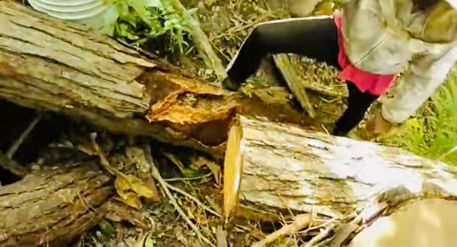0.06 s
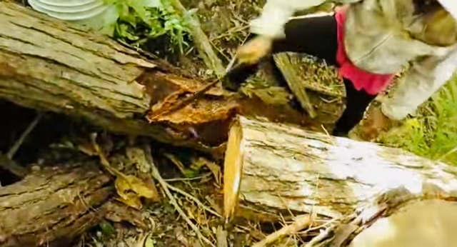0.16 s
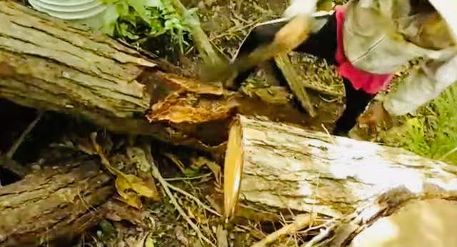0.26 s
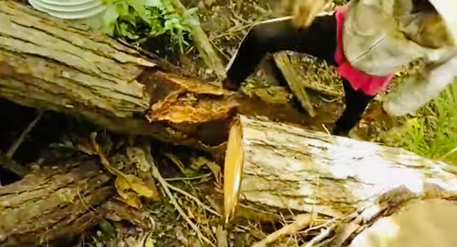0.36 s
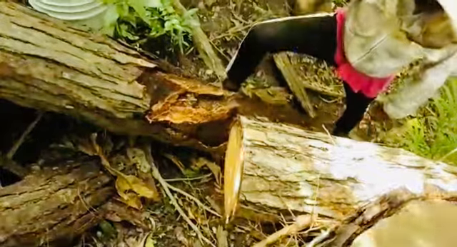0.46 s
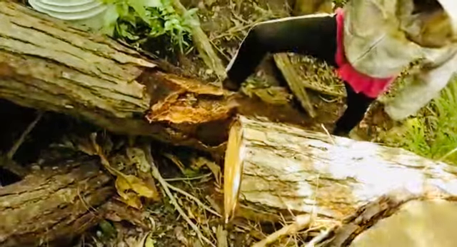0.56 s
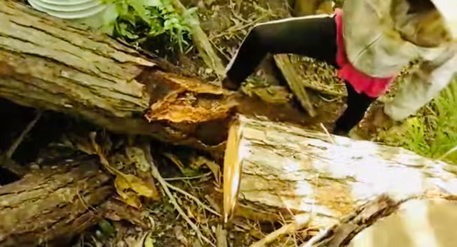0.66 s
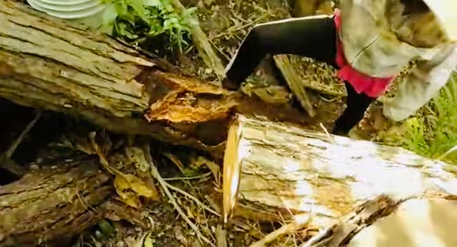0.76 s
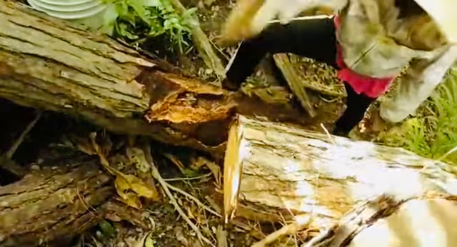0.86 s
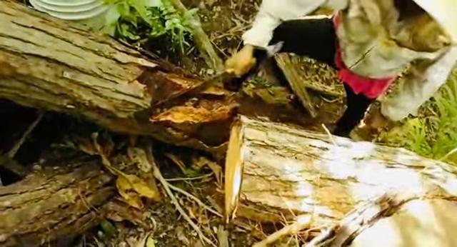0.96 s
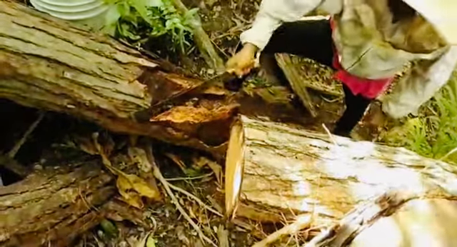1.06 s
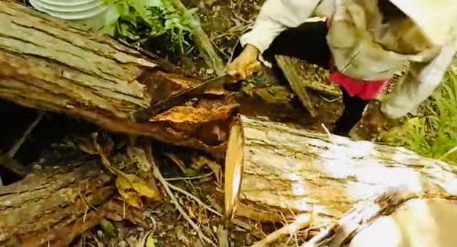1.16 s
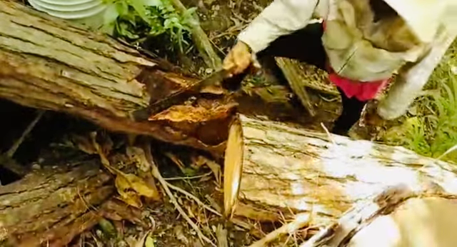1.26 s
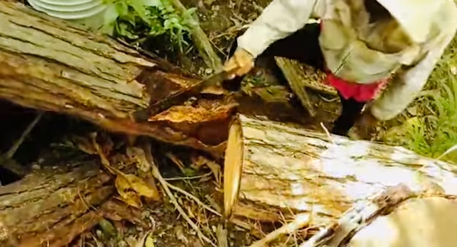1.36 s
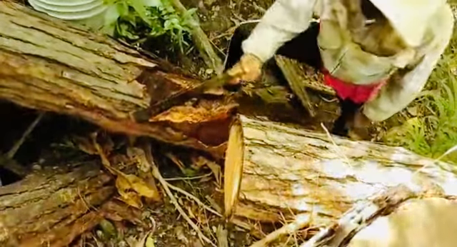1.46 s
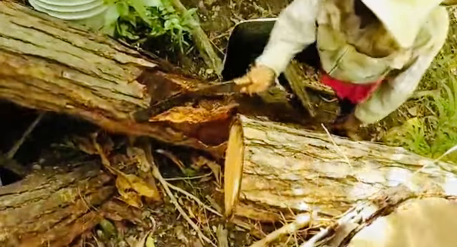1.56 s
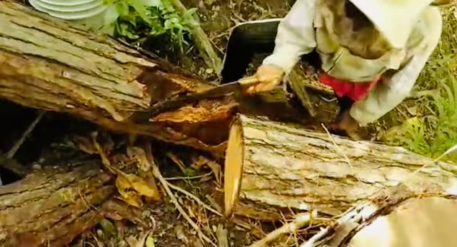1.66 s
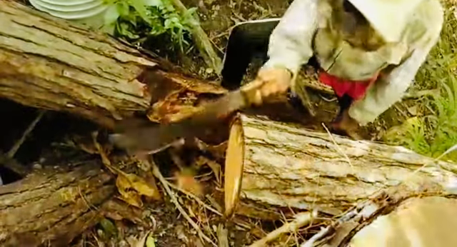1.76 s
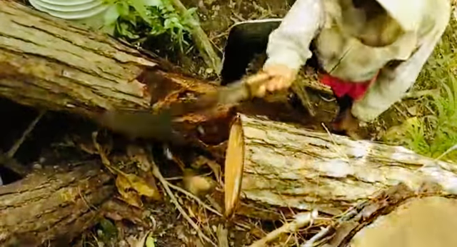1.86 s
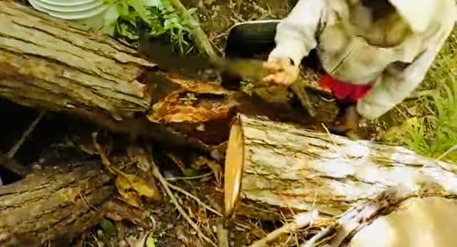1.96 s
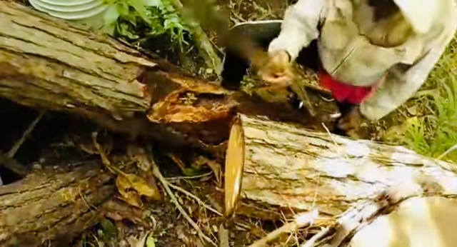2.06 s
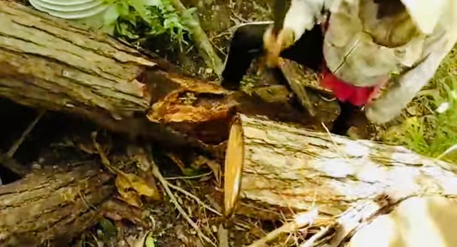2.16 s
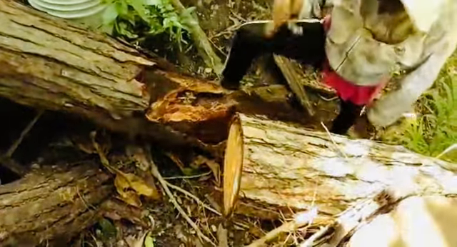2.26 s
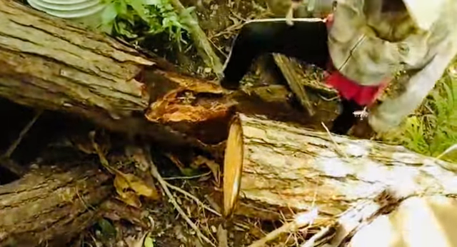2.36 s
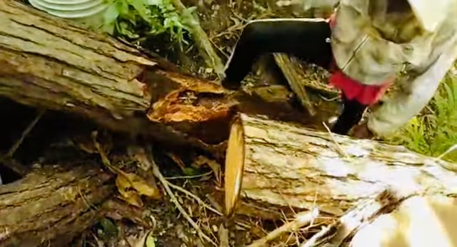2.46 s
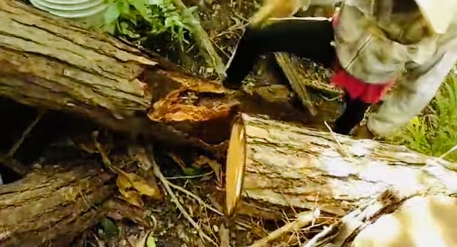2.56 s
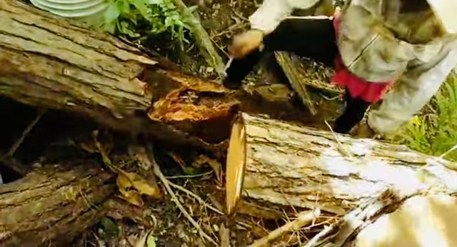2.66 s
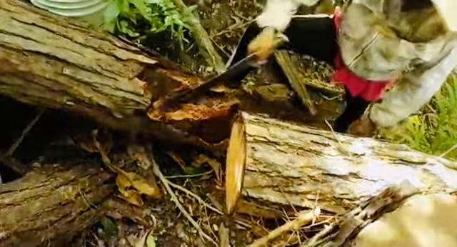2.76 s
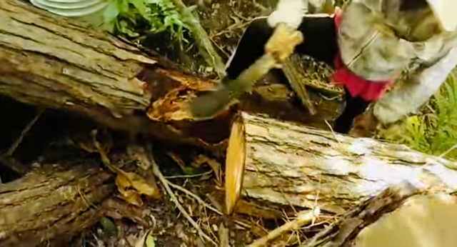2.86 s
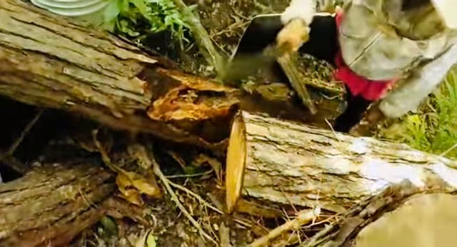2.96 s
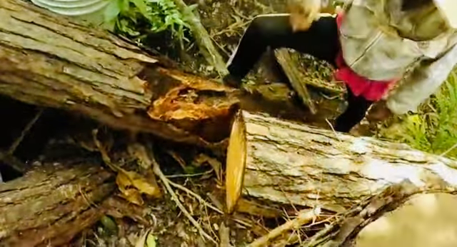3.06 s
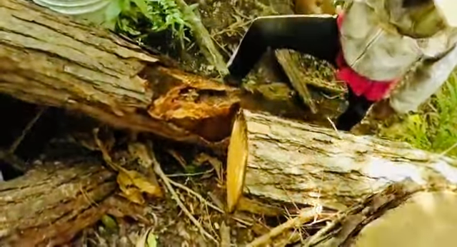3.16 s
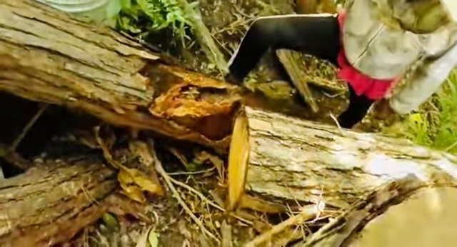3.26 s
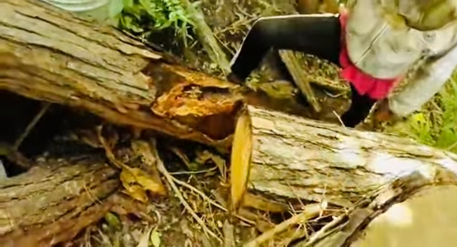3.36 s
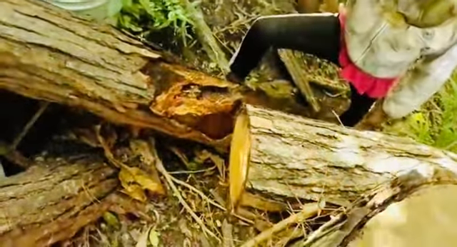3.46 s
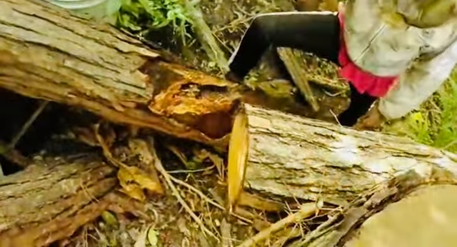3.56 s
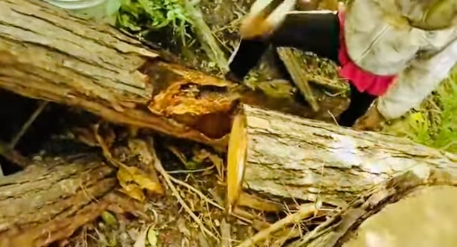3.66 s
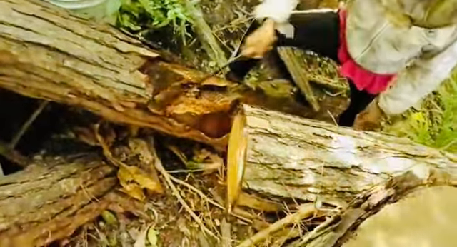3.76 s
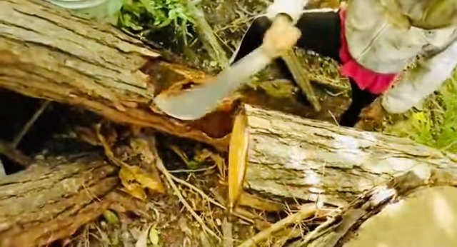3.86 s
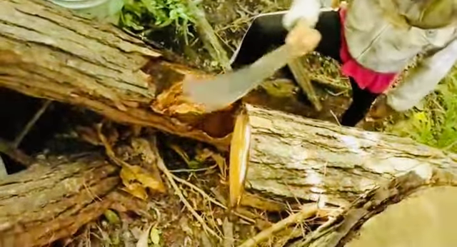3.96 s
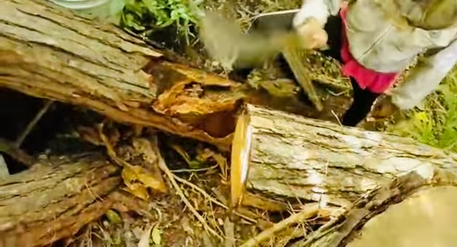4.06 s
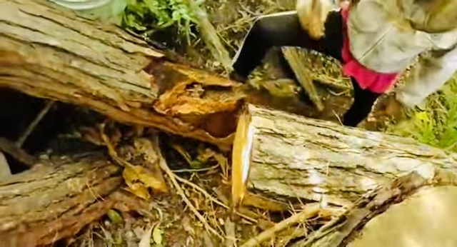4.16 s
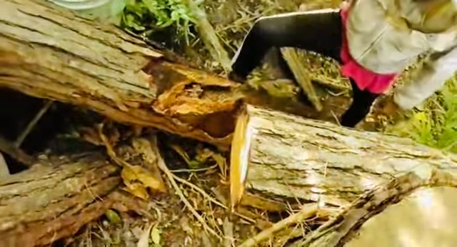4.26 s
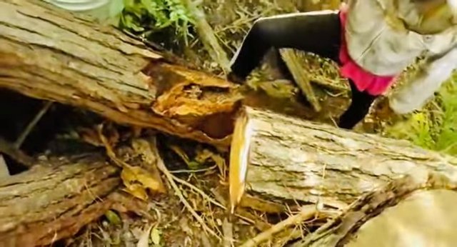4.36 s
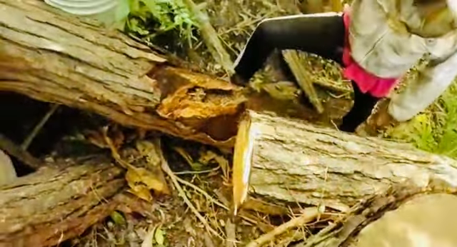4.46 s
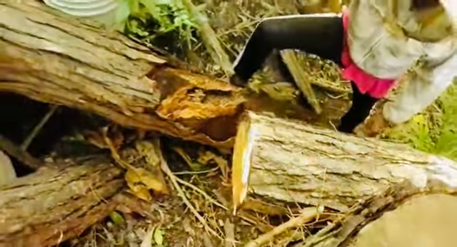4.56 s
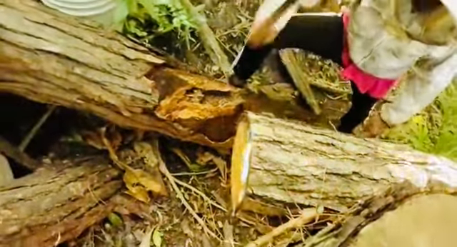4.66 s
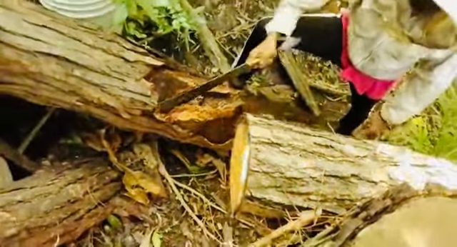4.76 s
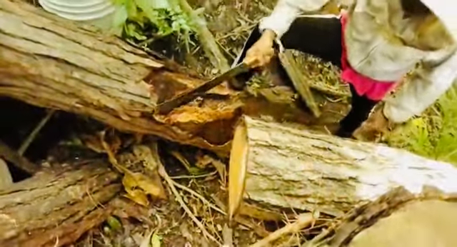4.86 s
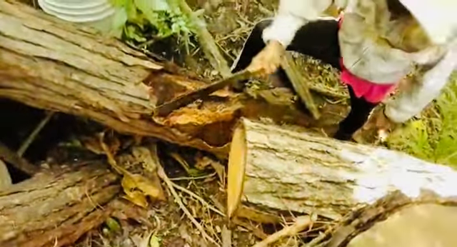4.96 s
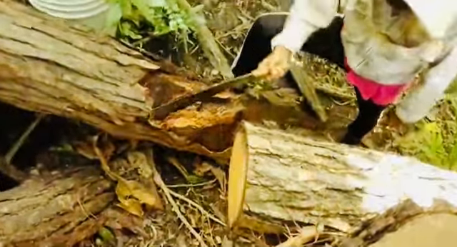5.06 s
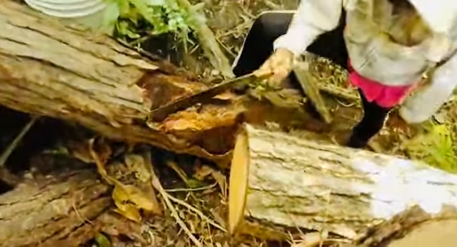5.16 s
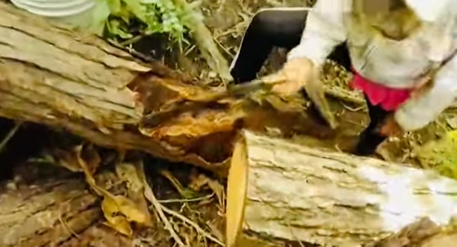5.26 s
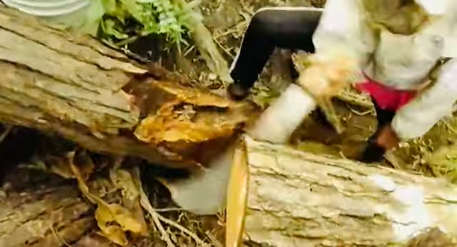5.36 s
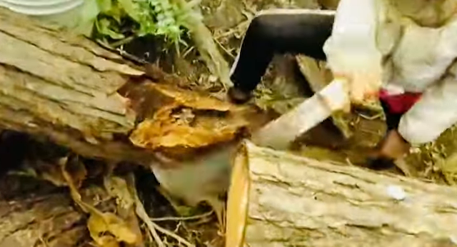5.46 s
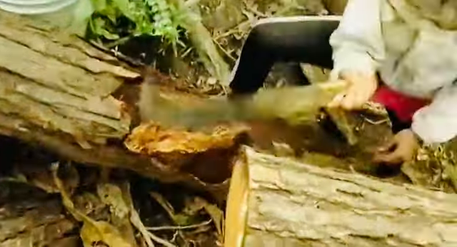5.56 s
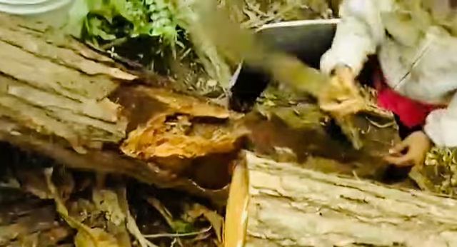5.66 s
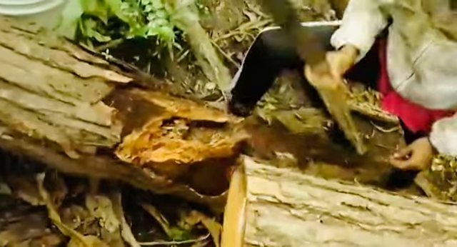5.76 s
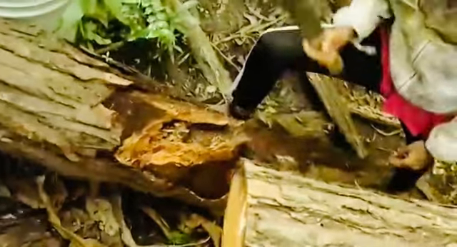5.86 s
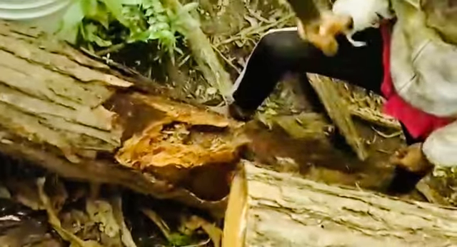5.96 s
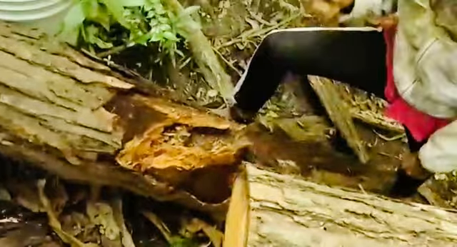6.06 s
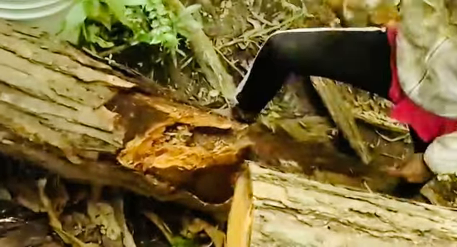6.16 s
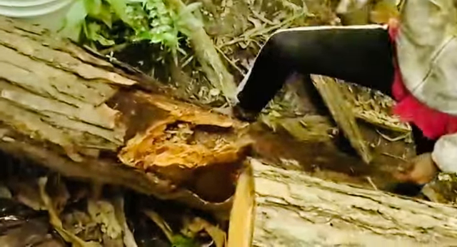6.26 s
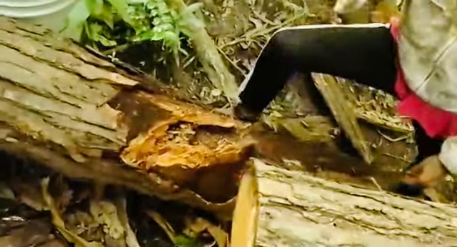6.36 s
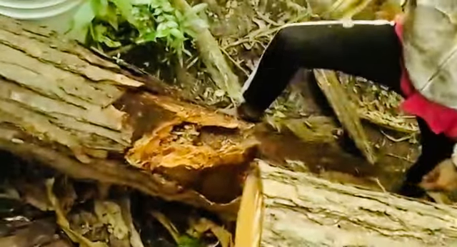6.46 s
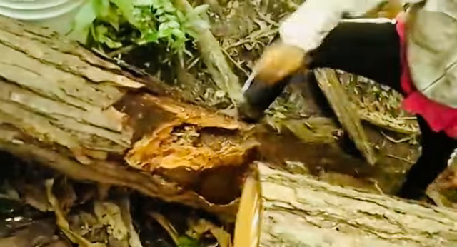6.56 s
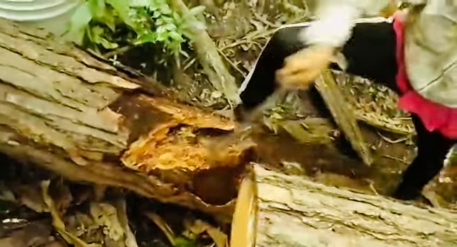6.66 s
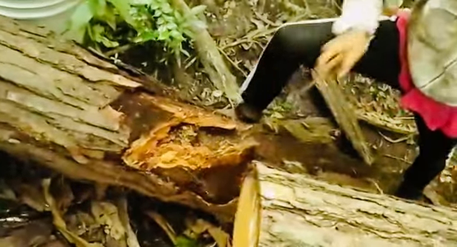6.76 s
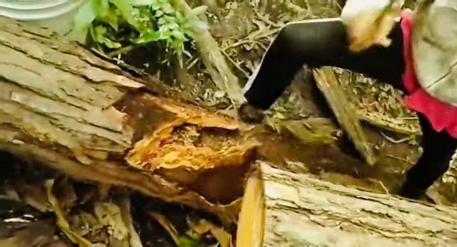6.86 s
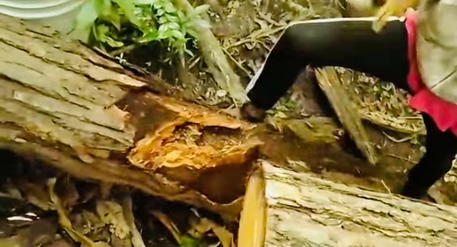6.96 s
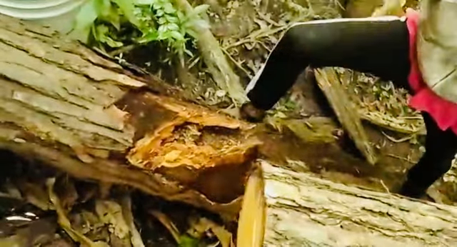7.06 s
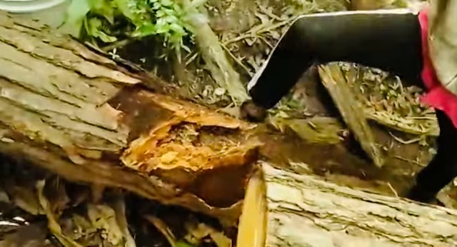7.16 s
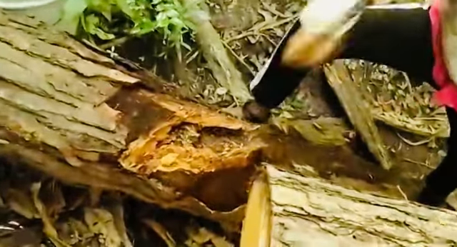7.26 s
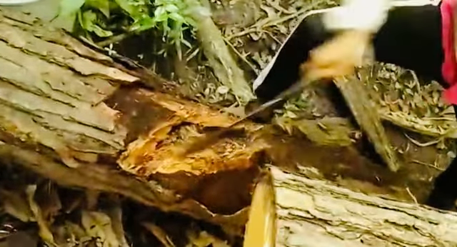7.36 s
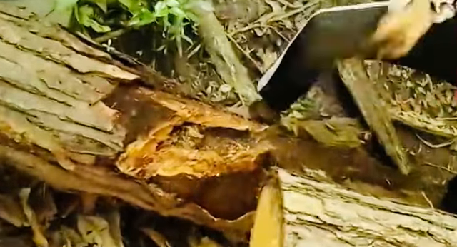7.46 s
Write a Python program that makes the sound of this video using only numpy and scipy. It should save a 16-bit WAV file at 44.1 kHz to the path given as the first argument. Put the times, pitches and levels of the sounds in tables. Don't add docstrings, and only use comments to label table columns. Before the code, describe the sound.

Hard machete blows crack into a hollow fallen trunk outdoors, echoing off trees, with bark snapping and tearing between them.

```python
import sys
import numpy as np
from scipy import signal
from scipy.fft import rfft, irfft
from scipy.io import wavfile
from scipy.ndimage import uniform_filter1d, map_coordinates

SR = 44100
rng = np.random.default_rng(int(sys.argv[2]) if len(sys.argv) > 2 else 0)


def makeup_ratio(level_db):
    decades = np.asarray(level_db, float) / 20
    return 10 ** decades


def waveform_to_disk(signal):
    frames = np.transpose(np.atleast_2d(signal))
    scaled = np.clip(frames, -1, 1) * 32767
    samples = np.round(scaled).astype(np.int16)
    wavfile.write(sys.argv[1], SR, samples)


N = 330740

# (t/s, crack peak level/dB, mids over treble/dB, mids of the echo/dB, far echo/dB)
BLOWS = [
    (0.0447, -8.5, -14, -2.47, -6),
    (0.835, -8.5, -13, -1.5, -6.5),
    (2.599, -13.5, -17, 0, -7.5),
    (3.6261, -7, -15, -2, -8.5),
    (4.6253, -4.5, -18.5, 0.6, -5.5),
    (6.5125, -11.5, -16, -5, 0.5),
    (7.222, -7.5, -16, -1.9, -1),
]
# (t/s, thud level/dB, f/Hz, time the blade sinks/s, lateness of the swell as a power)
THUDS = [
    (.044, -15.5, 494.4, 0.0077, 0.68),
    (.835, -21, 484, 0.018, 3),
    (2.599, -19.5, 597, 0.0092, 3.9),
    (3.625, -18.5, 638, 0.011, 1.6),
    (4.624, -16.5, 492.4, .013, 3.2),
    (6.513, -16, 506, 0.0079, 0.37),
    (7.222, -18.5, 676, 0.0067, 1.5),
]
# (t/s, level/dB)
WIND = [(0.0, -92), (0.21, -94.5), (0.42, -103.5), (3.4, -93), (3.74, -92), (4.2, -99), (4.45, -105),
        (4.74, -85.5), (5.16, -93), (5.35, -77.5), (5.68, -87), (5.85, -81.5), (6.39, -74), (7.08, -82.5),
        (7.23, -78), (7.5, -87)]
# (f/Hz, level/dB)
BARK = [(500, -8.5), (2000, -3.5), (3500, -2.5), (5200, -8), (6500, -2.5), (9000, 0), (11000, 3),
        (13500, -0.5)]


def unit(x):
    return x / np.sqrt(np.mean(x ** 2) + 1e-20)


def along(points, hz):
    f, v = np.transpose(points)
    return np.interp(np.log(hz + 1), np.log(f + 1), v)


def curves(rows):
    s, *cols = np.transpose(rows)
    return [np.interp(np.arange(N) / SR, s, c) for c in cols]


def wobble(rate, size=N):
    knots = rng.standard_normal(int(size * rate / SR) + 4)
    return map_coordinates(knots, [np.arange(size) * rate / SR])


def colour(x, points):
    ceps = irfft(np.log(makeup_ratio(along(points, np.fft.rfftfreq(4096, 1 / SR)))))
    ceps[1:2048] *= 2
    ceps[2049:] = 0
    response = irfft(np.exp(rfft(ceps)))
    return signal.fftconvolve(np.atleast_2d(x), response[None], axes=1)[:, :x.shape[-1]]


def tilted(points, mids_db):
    return [(f, db + mids_db * (f < 4500)) for f, db in points]


def diffuse(size):
    # (f/Hz, likeness of the ports from -1 to 1)
    alike = [(130, 0.98), (300, 0.72), (630, 0.46), (1400, -0.52), (3000, -0.0033), (6700, -0.16)]
    turn = np.arccos(np.clip(along(alike, np.fft.rfftfreq(size, 1 / SR)), -1, 1)) / 2
    noise = rfft(rng.standard_normal((2, size)))
    mid, side = irfft(noise * [np.cos(turn), np.sin(turn)], size)
    return np.array([mid + side, mid - side])


def splinters(size, shared, spiky_db):
    noise = rng.standard_normal((3, size))
    share = np.clip(shared, 0, 1)
    mixed = np.sqrt(share) * noise[0] + np.sqrt(1 - share) * noise[1:]
    return unit(makeup_ratio(spiky_db * wobble(1500, size=size)) * mixed)


def uneven(hz, t, depth_db):
    patches = uniform_filter1d(rng.standard_normal((len(hz), len(t))), size=8, axis=1)
    depth_db = depth_db * np.where(hz < 5500, 1, .4)[:, None]
    return makeup_ratio(depth_db * (rng.standard_normal((len(hz), 1)) + .8 * unit(patches)))


def trees(spectrum, far_db):
    # (f/Hz, time/s)
    near = [(300, 0.2), (2000, 0.18), (10000, 0.16)]
    # (f/Hz, time/s)
    far = [(300, 0.49), (2000, 0.53), (10000, 0.45)]
    size = SR // 2
    hz, t, z = signal.stft(diffuse(size), SR, nperseg=512)
    fade = makeup_ratio(-60 * t / along(near, hz)[:, None]) + makeup_ratio(far_db - 60 * t / along(far, hz)[:, None])
    fade = fade * uneven(hz, t, depth_db=2.6)
    tail = signal.istft(z * fade, SR, nperseg=512)[1][:, :size] * makeup_ratio(1.5 * wobble(200, size=size))
    tail = tail * (1 - np.exp(-np.arange(size) / SR / 0.0036))
    return colour(tail / np.linalg.norm(tail[0]), spectrum)


def add(track, s, sound, count=6):
    for port, lag in enumerate((count, 0)):
        part = track[port, round(s * SR) + lag:][:sound.shape[1]]
        part += sound[port, :len(part)]


def insect():
    # (t/s, length/s, f/Hz, level/dB)
    chirps = [
        (4.004, 0.048, 4940, -73),
        (4.11, .045, 4930, -91),
    ]
    out = np.zeros((2, N))
    for s, length, hz, db in chirps:
        t = np.arange(round(length * SR)) / SR
        swell = makeup_ratio(db) * np.sin(np.pi * t / length) ** .4
        add(out, s, swell * np.sin(2 * np.pi * hz * t) * np.ones((2, 1)))
    return out


def thicket():
    # (f/Hz, level/dB)
    leaf_sound = [(600, -9), (1500, 5.5), (3500, 0), (7000, -1.5), (14000, -1.5)]
    # (f/Hz, level/dB)
    rumble_sound = [(150, -7.5), (450, -2.5), (700, -8), (1500, -12), (3000, -30)]
    gust_db = curves(WIND)[0] - np.min(np.transpose(WIND)[1])
    blow_s, far_db = np.transpose(BLOWS)[[0, 4]][:, :, None]
    since = np.maximum(np.arange(N) / SR - blow_s, 0) / 0.062
    far_echo = np.sum(makeup_ratio(far_db) * since * np.exp(1 - since), axis=0)
    hiss = makeup_ratio(0.087 * gust_db) + makeup_ratio(13) * far_echo ** 2
    rumble = makeup_ratio(.15 * gust_db) + makeup_ratio(13) * far_echo
    flutter = makeup_ratio(-72 + 0.39 * wobble(38) + 0.2 * wobble(2.7))
    leaves = hiss * flutter * colour(diffuse(size=N), leaf_sound)
    return leaves + rumble * makeup_ratio(-75 + 2.2 * wobble(25)) * unit(colour(diffuse(size=N), rumble_sound))


def buffet():
    # (f/Hz, level/dB)
    wind_sound = [(15, -11), (50, -1), (100, -5.5), (135, -10.5), (170, -27.5), (280, -23.5), (500, -34.5),
                  (900, -55.5)]
    lumps = makeup_ratio(2.8 * np.array([wobble(6.8), wobble(12)]) + 2.1 * wobble(59))
    strength = makeup_ratio(curves(WIND)[0] + 5.5 + 1.5 * wobble(6.2))
    return strength * unit(lumps * colour(rng.standard_normal((2, N)), wind_sound))


def jolts():
    # (t/s, level/dB)
    puffs = [
        (1.6, -62),
        (5.24, -55),
        (5.679, -62),
        (7.1, -65.5),
    ]
    out, t = np.zeros((2, N)), np.arange(SR // 5) / SR
    # (t/s, level/dB, rise/s, fall by 60 dB/s)
    pushes = [(s, db - 43, .003, .3) for s, db, *_ in THUDS] + [(s, db, .03, .15) for s, db in puffs]
    for s, jolt_db, rise, t60 in pushes:
        push = sum(np.sin(2 * np.pi * hz * t * rng.normal(1, 0.064, (2, 1))) for hz in (65, 110, 165))
        add(out, s, makeup_ratio(jolt_db - 60 * t / t60) * (1 - np.exp(-t / rise)) * push)
    return out


def tearing():
    # (t/s, hold/s, level/dB, fall by 60 dB/s)
    strips = [
        (1.4, 0.13, -63, .3),
        (1.568, 0.043, -53, 0.51),
        (1.776, 0.34, -76.5, .4),
        (2.097, .02, -73, .45),
        (5.1, .06, -69, .2),
        (5.169, 0.017, -61, 0.12),
        (5.293, .01, -65, 0.14),
        (5.35, .05, -85, 0.42),
    ]
    time = np.arange(N) / SR
    level = 0
    for s, hold, db, t60 in strips:
        rise_db = -60 * np.maximum(s - time, 0) / 0.056
        fall_db = -60 * np.maximum(time - s - hold, 0) / t60
        level = level + makeup_ratio(db + rise_db + fall_db)
    return makeup_ratio(1.9 * wobble(160)) * level * colour(splinters(size=N, shared=0.14, spiky_db=2.5), BARK)


def snaps():
    # (t/s, peak level/dB, mids over treble/dB, left over right/dB)
    snap_events = [(1.39, -50, -17, 6), (1.4476, -47, -19, 11), (1.483, -32, -27, -3),
                   (1.516, -25, -31, -7), (1.5268, -14, -30.5, -5.5), (1.539, -23.5, -53, -16),
                   (1.565, -25, -46, -3), (1.5758, -16.5, -34.5, -19.5), (1.5834, -28, -26, -10),
                   (1.5878, -11, -30, 0.5), (1.596, -25, -21, -7), (1.7714, -50, 0, -11),
                   (1.815, -52, -7, -2), (1.8697, -45.5, -14, -1), (1.924, -55, -6, -1),
                   (1.981, -49, -23, -18), (2.0492, -48.5, -19, -14), (2.063, -43, -23, -2),
                   (2.129, -46, -14.5, -8.5), (5.103, -37, -21, -0.5), (5.121, -45, -21, -12),
                   (5.1776, -20.5, -24, -1), (5.1857, -26, -22, 5), (5.1958, -39, -22, 13),
                   (5.2931, -30.5, -10.5, 3.5), (5.3763, -51.5, -23.5, 24), (6.8967, -47.5, -9, 0)]
    out, t = np.zeros((2, N)), np.arange(SR // 10) / SR
    for s, snap_db, mids_db, pan_db in snap_events:
        bark = tilted(BARK, mids_db + 19.5)
        side = makeup_ratio(np.array([[.5], [-.5]]) * (pan_db + 1.0))
        tick_and_fizz = makeup_ratio(-60 * t / 0.00184) + makeup_ratio(-6 - 60 * t / 0.036)
        puff = makeup_ratio(snap_db - 7.5) * tick_and_fizz * (1 - np.exp(-t / 0.00014))
        snap = colour(puff * splinters(size=len(t), shared=0.47, spiky_db=5.3), bark)
        add(out, s - .0004, side * snap)
        add(out, s, side * makeup_ratio(snap_db + 2) * trees(bark, far_db=-39))
    return out


def knocks():
    # (t/s, level/dB, f/Hz, fall by 60 dB/s)
    knock_events = [(1.53, -56.5, 667, 0.058), (1.59, -46, 1570, 0.054), (1.6, -49.5, 497, 0.14),
                    (1.772, -34.5, 1030, 0.015), (1.773, -52.5, 647, 0.062), (1.774, -58, 2680, .014),
                    (1.772, -44, 1540, 0.014), (1.815, -53, 825, 0.02), (1.953, -56.5, 770, 0.022),
                    (2.104, -52, 1360, 0.015), (5.106, -61.5, 611, 0.074), (5.181, -49.5, 1750, 0.084),
                    (5.178, -51, 481, 0.17), (5.29, -49.5, 237.4, 0.18), (5.292, -43, 582, 0.087),
                    (5.292, -45, 3025, 0.045), (5.973, -57, 278, 0.065), (7.114, -65.5, 259, 0.032)]
    out, t = np.zeros((2, N)), np.arange(SR // 10) / SR
    for s, db, hz, t60 in knock_events:
        swell = makeup_ratio(db - 60 * t / t60) * (1 - np.exp(-t / 0.00066))
        knock = 0
        for k in (1, 1.4):
            cycles = hz * k * t + 0.23 * wobble(232, size=len(t))
            knock = knock + swell / k ** 2.1 * np.sin(2 * np.pi * cycles)
        add(out, s - .0005, knock * np.ones((2, 1)))
    return out


def steel():
    # (t/s, level/dB, favoured f/Hz, loss per octave away/dB)
    rings = [
        (1.64, -59, 1615, 42),
        (2.604, -30.5, 959, 32),
        (2.602, -31.5, 1950, 45.5),
        (5.183, -49.5, 6700, 7.5),
        (5.296, -55, 1615, 34),
        (5.294, -61, 7555, 37),
        (5.376, -67, 7555, 40.5),
        (6.516, -34.5, 2000, 2.5),
    ]
    # (f/Hz, level/dB, fall by 60 dB/s)
    blade = [(389, 2.5, 0.24), (959, -3, .2), (1615, -4, 0.24), (1950, -9, .08), (2340, -1, 0.21),
             (2860, -7.5, 0.124), (4088, -1, 0.15), (7190, -10, .17), (7555, -1.5, 0.2), (11270, -8, .22)]
    out, t = np.zeros((2, N)), np.arange(SR // 3) / SR
    for s, touch_db, touch_hz, slope_db in rings:
        for hz, db, t60 in blade:
            level_db = touch_db + db - slope_db * abs(np.log2(hz / touch_hz))
            ring = makeup_ratio(level_db - 60 * t / t60 + 1.8 * wobble(70, size=len(t))) * (1 - np.exp(-t / .004))
            tone = np.sin(2 * np.pi * (hz * t + .09 * wobble(110, size=len(t))))
            add(out, s, ring * tone * np.ones((2, 1)), count=1)
    return out


def thuds():
    # (f/Hz, level/dB, fall by 60 dB/s)
    hollow = [(305.3, -6.5, 0.09), (470, -5.5, 0.1), (620, -12, 0.14), (735, -5, .035), (1073, -4.5, 0.034)]
    # (f/Hz, level/dB)
    boom = [(150, -15.5), (320, 4), (600, -2), (1000, -13), (2000, -31)]
    out, t = np.zeros((2, N)), np.arange(SR // 4) / SR
    for s, thud_db, hz, sink, late in THUDS:
        after = 0.041 * np.exp(-0.27 * late)
        sunk = np.minimum(t / sink, 1)
        pump = sunk ** abs(late) * makeup_ratio(-60 * np.maximum(t - sink, 0) / after)
        thud = pump * np.sin(2 * np.pi * (hz * t + .07 * wobble(150, size=len(t))))
        for f, db, t60 in hollow:
            swing = 2 * np.pi * (f * t + .12 * wobble(80, size=len(t)))
            thud = thud + makeup_ratio(db - 60 * t / t60) * sunk ** (.4 * abs(late)) * np.sin(swing)
        add(out, s - .001, makeup_ratio(thud_db - 0.5) * thud * makeup_ratio([[-.8], [.8]]))
        add(out, s, makeup_ratio(thud_db + 22) * trees(boom, far_db=-8.5))
    return out


def cracks():
    # (f/Hz, level/dB)
    fibre_sound = [(300, -3), (1000, 2), (2500, -1), (5000, -4.5), (9000, -0.5), (14000, -0.5)]
    out, t = np.zeros((2, N)), np.arange(SR // 8) / SR
    for s, crack_db, mids_db, dull_db, far_db in BLOWS:
        burst = (1 - np.exp(-t / 0.00012)) * makeup_ratio(-60 * np.maximum(t - .0045, 0) / 0.027)
        fibre = tilted(fibre_sound, mids_db + 14)
        crack = colour(burst * splinters(size=len(t), shared=.3, spiky_db=2.0), fibre)
        add(out, s - .001, makeup_ratio(crack_db - np.array([[9.7], [8.2]])) * crack)
        add(out, s, makeup_ratio(crack_db + 13.5) * trees(tilted(fibre, dull_db), far_db))
        graze = np.linspace(.1, 1, 160) * splinters(size=160, shared=0.37, spiky_db=1)
        add(out, s - .0045, makeup_ratio(-48) * graze)
    return out


def scene():
    # (f/Hz, level/dB)
    port_cut = [(100, -41.5), (165, -22.5), (210, -0.5), (300, 1.5)]
    # (f/Hz, level/dB)
    left = [(300, -2), (4500, 3), (6500, 7.5), (7550, 16.5), (8100, 11.5), (8700, 5), (9900, -5.5),
            (12500, -9.5), (14200, -11.5), (15300, -34.5)]
    # (f/Hz, level/dB)
    right = [(300, 0), (6500, 2), (9000, 1.5), (10100, 2.5), (10700, 10.5), (11500, 5.5), (12200, -1),
             (13200, -7.5), (14200, -14.5), (15300, -36)]
    background = insect() + thicket()
    between_blows = tearing() + snaps() + knocks()
    chops = steel() + thuds() + cracks()
    air = colour(background + between_blows + chops, port_cut)
    return np.concatenate([colour(air[0], left), colour(air[1], right)]) + buffet() + jolts()


def band_limit(x):
    return signal.sosfilt(signal.butter(12, 15330, fs=SR, output="sos"), x)


def record(dry):
    rounded = dry / (1 + np.abs(dry / .62) ** 4) ** (1 / 4)
    cut = signal.sosfilt(signal.butter(12, 14800, fs=SR, output="sos"), rounded)
    return band_limit(cut - makeup_ratio(-77.5))


dry = scene()
out = record(dry)
waveform_to_disk(out)
```